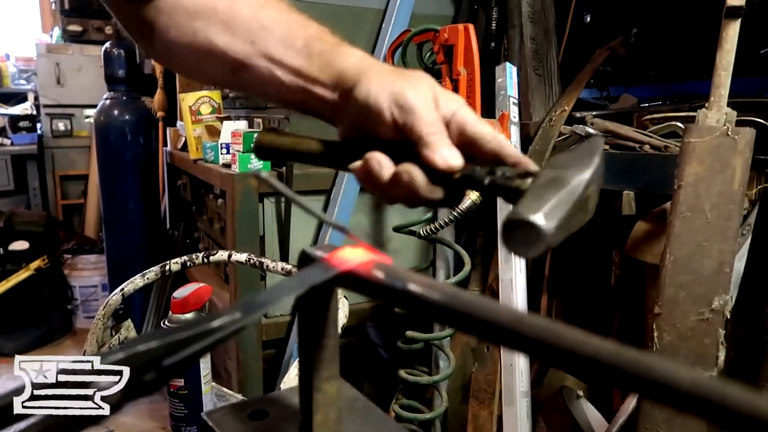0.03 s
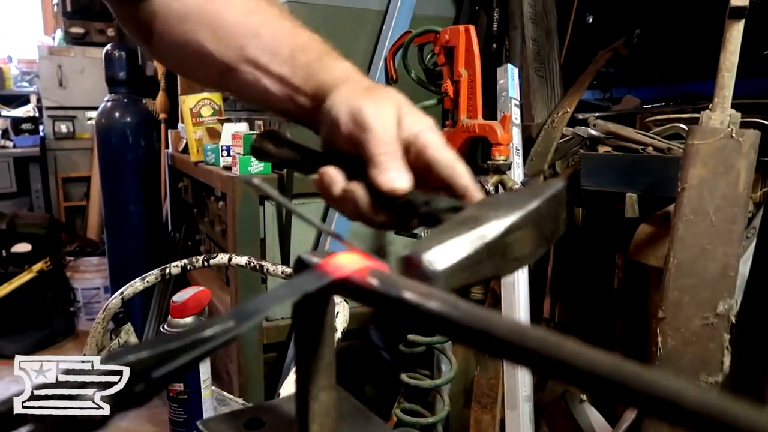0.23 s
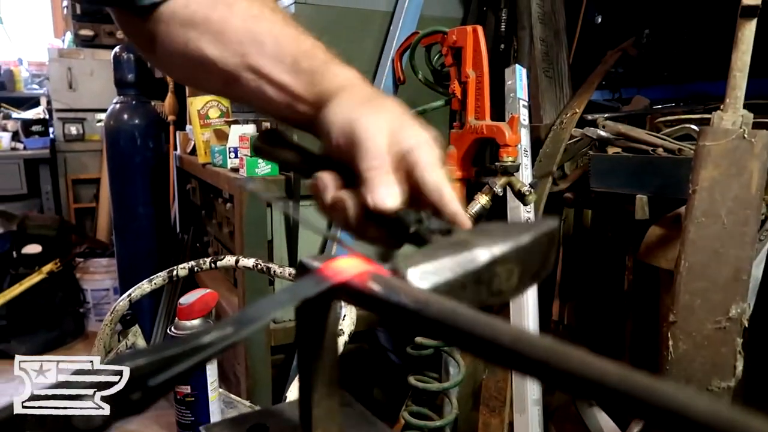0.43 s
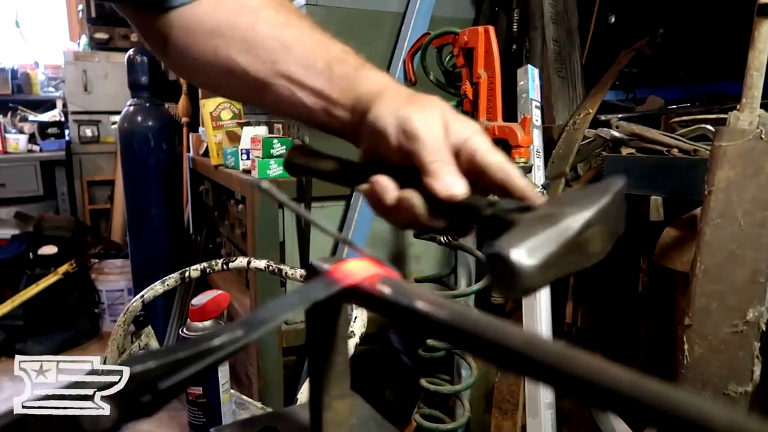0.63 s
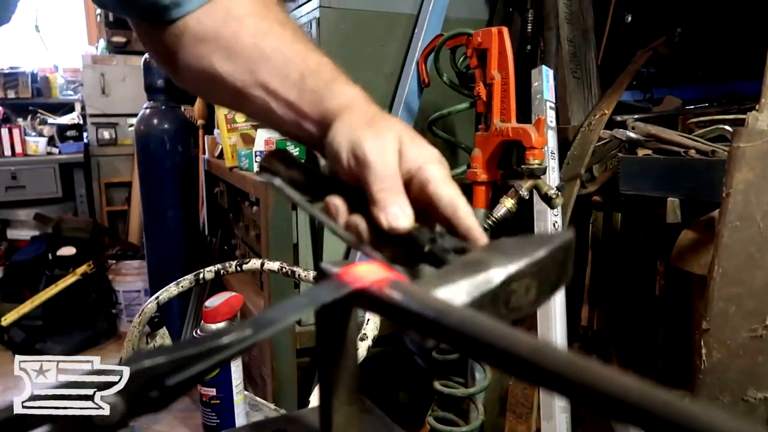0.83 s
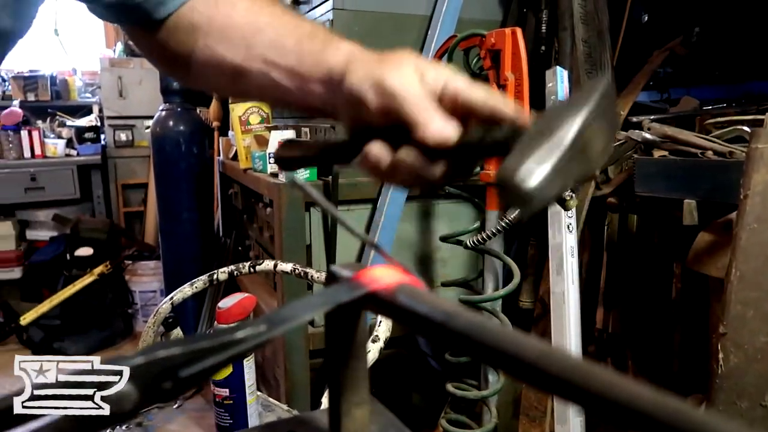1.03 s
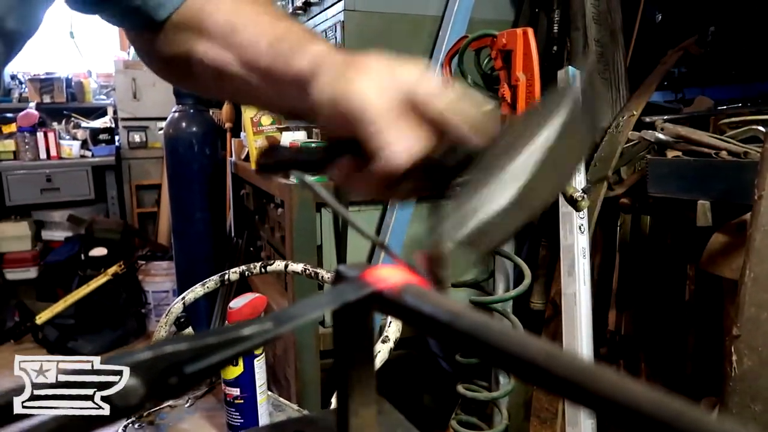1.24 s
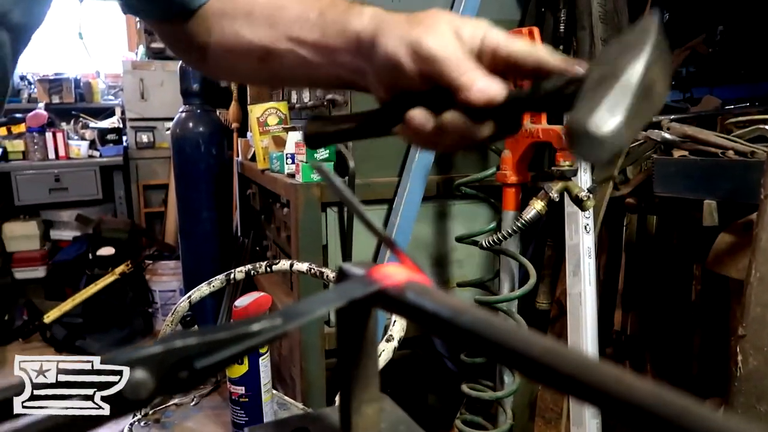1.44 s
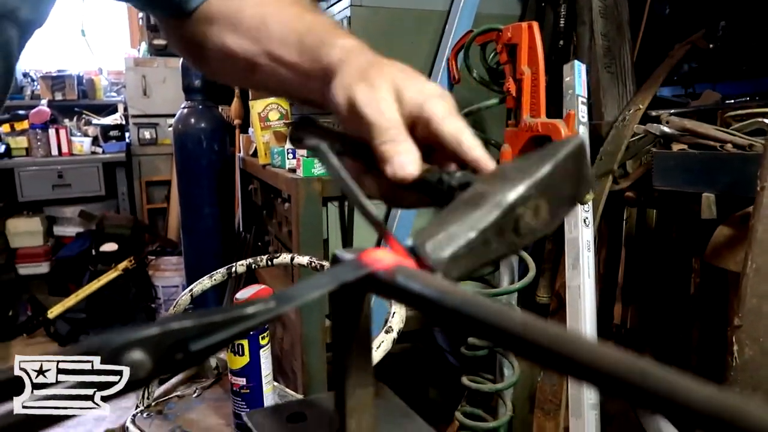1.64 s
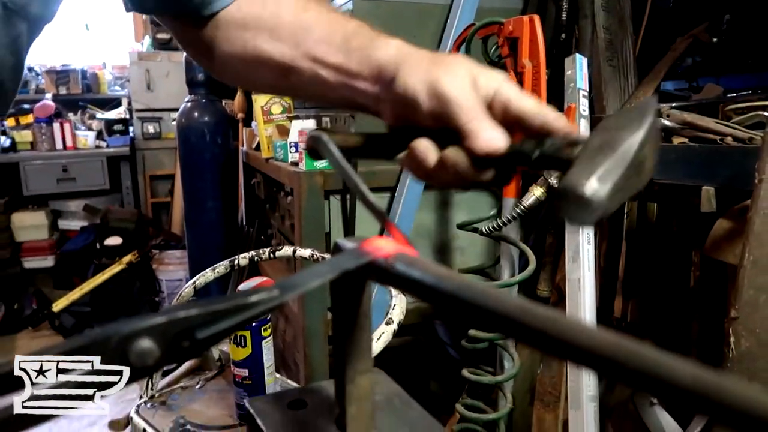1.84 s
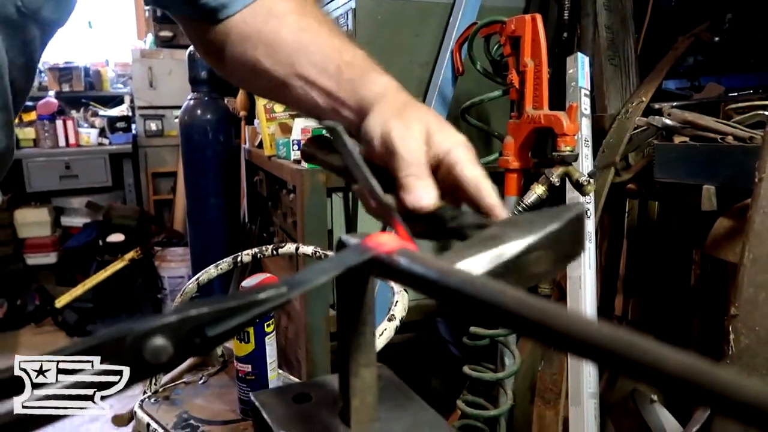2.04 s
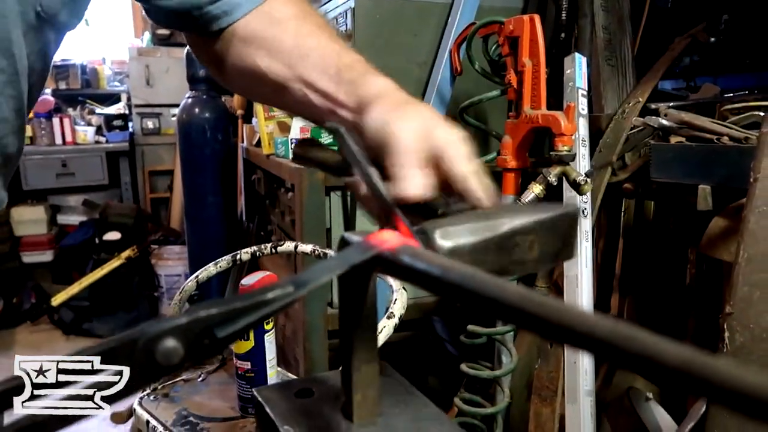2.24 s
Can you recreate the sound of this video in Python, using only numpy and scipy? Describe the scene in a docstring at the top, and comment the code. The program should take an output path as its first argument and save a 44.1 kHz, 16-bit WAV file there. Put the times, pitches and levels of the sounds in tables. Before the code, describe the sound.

Close stereo pickup of hammering on hot iron; hard cracking clanks with a dull low thud and quickly damped ring, three blows, a pause, three more, short room echo, very quiet background.

```python
"""A blow is already dying away; then more hammer blows fall on hot iron, about three a second, with one longer gap.
Each blow is a burst of noise (crack), a longer rattle (clatter) and damped sines: clank, iron bar, stand, anvil ring.
Soft low bumps and faint ticks fall in between, over workshop noise that sinks, then stays nearly steady.
Decaying noise makes the room's answer; a two-port microphone with a noise suppressor hears it all."""
import sys
import numpy as np
from scipy import signal
from scipy.fft import rfft, irfft, next_fast_len
from scipy.io import wavfile
from scipy.ndimage import uniform_filter1d

SR = 44100
rng = np.random.default_rng(int(sys.argv[2]) if len(sys.argv) > 2 else 0)


def unload_audio(sound):
    """Save the sound as a 16-bit wav file, at the path given as the first command line argument."""
    columns = np.transpose(np.atleast_2d(sound))
    # keep every value between -1 and 1, then stretch to whole-number steps
    steps = np.round(np.clip(columns, -1, 1) * 32767)
    wavfile.write(sys.argv[1], SR, steps.astype(np.int16))


def amplitude_ratio(level_db):
    """Convert a level in decibels to the matching linear amplitude (field) ratio."""
    exponent = np.asarray(level_db, float) / 20
    return 10 ** exponent


N = 101429  # length in samples
PAD = SR // 4  # samples of room for the blow that starts early

# when each blow lands: start_s (below 0 = before the sound begins)
BLOW_STARTS = [-.1, .2217, .5552, .8838, 1.3669, 1.6963, 2.0207]
# each blow's relative levels and brightness: crack_db, crack_bright_db_per_octave,
# clank_bright_db_per_octave, clank_db, ring_db, bar_db, thud_db, room_db
BLOW_LEVELS = [(-13, 0, 0, -18, -48, -21.5, -25.5, 5), (-5.5, -4, -5, -6, -25, -19.5, -25.5, 0),
               (-14.5, -3.5, 0, -11, -32.5, -25.5, -29.5, 2.5), (-12, -7, 1, -12, -43.5, -26, -30, 3),
               (-11.5, 3.5, 2, -18.5, -47.5, -16, -25, 1), (-9.5, 0.5, -1, -8, -34, -16, -29, -1.5),
               (-12.5, -1.5, -7.5, -17.5, -35.5, -24.5, -32, 4)]
# how well each blow's contact point wakes the hammer head's high chimes: level_db
UPPER_CHIME_LEVELS = [-0.5, 0, 1, 4, -8, -11.5, -14]
UPPER_CHIME_FROM_HZ = 3000

# colour of the crack: pitch_hz, level_db
CRACK_COLOUR = [(300, -42), (1000, -11.5), (3000, -2.5), (6000, -2.5), (9000, 2), (12000, -0.5),
                (15000, -3), (17000, -24)]
CRACK_T60_S = 0.016  # t60 = time to fall by 60 dB

# dense clatter of bar, tongs and vice: pitch_hz, level_db
CLATTER_COLOUR = [(150, -33.5), (300, -9), (500, -2.5), (900, -0.5), (1300, -11), (2500, -11.5),
                  (5000, -16.5), (10000, -25)]
CLATTER_OVER_BAR_DB, CLATTER_T60_S = 7, 0.13

# heavily damped tones of hammer head and hot iron: pitch_hz, level_db
CLANK_MODES = [(1190, -8.5), (1590, -7.5), (1810, 3.5), (1880, -1), (2350, -4.5), (2800, -4.5), (3110, 3.5),
               (3510, -3.5), (4200, -14), (4860, -14.5), (5600, -8), (6900, -31.5), (8700, -20)]
CLANK_T60_S, CLANK_RISE_S, CLANK_SCATTER_DB = 0.024, 0.0008, 1
CLANK_DETUNE = 0.01  # typical pitch change from blow to blow, as a fraction

# tones of the long iron bar: pitch_hz, level_db, t60_s
BAR_MODES = [(345, -15.5, .07), (412, -10.5, .08), (500.7, -5, 0.076), (619.5, -8.5, .08),
             (675, -3.5, 0.071), (810, -5, 0.091), (816, 1, 0.065), (1005, -15, 0.09)]
# tones of the stand: pitch_hz, level_db, t60_s
STAND_MODES = [(50.7, -8.5, 0.42), (116, -9.5, 0.049), (160, -1, 0.089), (198, 0.5, 0.14),
               (238.5, -1, 0.16), (330, -12.5, 0.23)]
LOW_RISE_S, LOW_SCATTER_DB = 0.0022, 2.5  # bar and stand
# the stand's shove, its pitch sagging
SWAY_FROM_HZ, SWAY_TO_HZ, SWAY_GLIDE_S = 170, 43.5, 0.015
SWAY_T60_S, SWAY_DB = 0.14, 2.5

# the anvil's tones: pitch_hz
ANVIL_PITCHES = [2669, 4461, 7838]
# strength and decay of those tones: level_db, t60_s
ANVIL_DECAYS = [(2, 0.4), (-29.5, .6), (-19.5, 0.3)]
# the hammer head's longer tones: pitch_hz
CHIME_PITCHES = [1832, 1956, 3456, 4113, 5582]
# their strength over the clank and their decay: level_db, t60_s
CHIME_DECAYS = [(-23.5, .26), (-24, 0.26), (-33.5, 0.27), (-27, 0.21), (-26.5, 0.17)]
RING_SWELL_S, RING_SCATTER_DB = 0.016, 1  # anvil and chimes

# decay of the room's answer: pitch_hz, t60_s
ROOM_DECAY = [(60, 0.69), (250, 0.26), (800, 0.19), (2000, 0.23), (5000, 0.19), (10000, 0.15),
              (15000, 0.057)]
# colour of the room's answer, beside the direct sound: pitch_hz, level_db
ROOM_COLOUR = [(60, -9.5), (300, -5), (1000, -3), (3000, -6), (6000, -4.5), (10000, -9.5), (15000, -8)]
# left-right likeness of the room's answer: pitch_hz, likeness (1 = the same)
ROOM_LIKENESS = [(150, .996), (350, .98), (800, .995), (2000, .85), (5000, .45), (10000, .6)]
FIRST_WALL_S, TONES_TO_ROOM_DB = 0.004, -4.5

# soft bumps as the work settles: start_s, level_db, pitch_hz
SOFT_BUMPS = [(0.132, -50, 160), (0.392, -65.5, 168), (0.701, -52, 164.6), (1.001, -65, 160),
              (1.07, -54.5, 185), (1.546, -53.5, 182), (1.608, -60.5, 183), (1.911, -48, 187),
              (2.129, -61, 186)]
BUMP_T60_S, BUMP_RISE_S = 0.24, 0.0029

# faint handling ticks: start_s, level_db
HANDLING_TICKS = [(1.56, -53.5), (1.582, -52), (1.96, -63)]
# colour of the ticks: pitch_hz, level_db
TICK_COLOUR = [(800, -26), (2000, -1), (4000, -3), (7000, -5), (10000, -25)]

# colour of the workshop background: pitch_hz, level_db
AIR_COLOUR = [(20, -2.5), (45, 0.5), (100, -10), (200, -9.5), (500, -19), (900, -19), (1500, -25.5),
              (3000, -27.5), (6000, -27.5), (10000, -37), (11000, -63.5)]
# its left-right likeness: pitch_hz, likeness (1 = the same)
AIR_LIKENESS = [(100, .999), (1000, .98), (4000, 1), (10000, 0.5)]
# its slow change in level: time_s, level_db
AIR_LEVELS = [(0, 3), (0.501, -2), (1.199, -4.5), (2.3, -4)]
AIR_DB = -60.5  # average level before the slow change

# phase lead of the first port over the second: pitch_hz, lead_rad
PORT_LEAD = [(300, -.08), (800, -.06), (1400, -.5), (3000, -.55), (4200, 0), (5000, 1.1), (8000, 1.6),
             (15000, 1.5)]
# level of the first port over the second: pitch_hz, level_db
PORT_TILT = [(700, 0), (1400, -1.7), (3000, -1.6), (5000, .4)]
LOW_CUT_HZ, TOP_HZ = 32, 15600

# the noise suppressor's threshold in each frequency bin: pitch_hz, level_db
GATE_THRESHOLD = [(50, -100), (300, -84), (1000, -91.5), (3000, -78.5), (8000, -89), (14000, -96.5)]
GATE_DEPTH_DB, GATE_RELEASE_S, GATE_STEEP = -9, 0.015, 1.5


def along(points, hz):
    """Reads a curve of (Hz, value) points, spaced by the logarithm of pitch."""
    f, v = np.transpose(points)
    return np.interp(np.log(hz + 1), np.log(f + 1), v)


def filtered(x, response):
    """Changes the strength and phase of each frequency by the given response."""
    n = x.shape[-1]
    m = next_fast_len(n + 8192)
    spectrum = rfft(x, m) * response(np.fft.rfftfreq(m, 1 / SR))
    return irfft(spectrum, m)[..., :n]


def pair(noise, alike, points):
    """Colours two noises and mixes them to a given left-right likeness."""
    def shares(hz):
        turn = np.arccos(np.clip(along(alike, hz), -1, 1)) / 2
        return amplitude_ratio(along(points, hz)) * [np.cos(turn), np.sin(turn)]

    mid, side = filtered(noise, shares)
    return np.array([mid + side, mid - side])


def modes(rows, t, rise_s, scatter_db):
    """Adds up dying sines, with small random changes of strength and starting phase."""
    hz, db, t60 = np.transpose(rows)[:, :, None]
    chance = rng.standard_normal((2, len(rows), 1))
    level = amplitude_ratio(db + scatter_db * chance[0] - 60 * t / t60)
    ring = level * np.sin(2 * np.pi * hz * t + 0.3 * chance[1])
    return ring.sum(0) * (1 - np.exp(-t / rise_s))


def hammer():
    """Adds every blow: its direct sounds and the room's answer to the shorter ones."""
    out = np.zeros((2, N + PAD + SR))
    t = np.arange(SR * 3 // 4) / SR
    for start_s, upper_db, levels in zip(BLOW_STARTS, UPPER_CHIME_LEVELS, BLOW_LEVELS):
        crack_db, edge_db, bright_db, clank_db, ring_db, bar_db, thud_db, room_db = levels
        noise = crack(t, crack_db, edge_db) + clatter(t, bar_db)
        tones = clank(t, clank_db, bright_db) + bar(t, bar_db) + thud(t, thud_db)
        ringing = anvil(t, ring_db) + chime(t, clank_db, upper_db)
        answer = amplitude_ratio(room_db) * room(noise + amplitude_ratio(TONES_TO_ROOM_DB) * tones)
        first = PAD + round(start_s * SR)
        out[:, first:first + len(t)] += noise + tones + ringing + answer
    return out[:, PAD:PAD + N]


def crack(t, level_db, edge_db):
    """The first hard contact: a very short burst of coloured noise."""
    burst = rng.standard_normal(len(t)) * amplitude_ratio(-60 * t / CRACK_T60_S)

    def colour(hz):
        tilt_db = edge_db * np.log2((hz + 1000) / 6000)  # no change at 5000 Hz
        return amplitude_ratio(along(CRACK_COLOUR, hz) + tilt_db)

    return amplitude_ratio(level_db) * filtered(burst, colour)


def clatter(t, bar_db):
    """Dense clatter of bar, tongs and vice: noise that rises fast and dies more slowly."""
    rattle = rng.standard_normal(len(t)) * amplitude_ratio(-60 * t / CLATTER_T60_S)
    rattle = rattle * (1 - np.exp(-t / LOW_RISE_S))
    coloured = filtered(rattle, lambda hz: amplitude_ratio(along(CLATTER_COLOUR, hz)))
    return amplitude_ratio(bar_db + CLATTER_OVER_BAR_DB) * coloured


def clank(t, level_db, bright_db):
    """Hammer head and hot iron: heavily damped tones, slightly detuned at each blow."""
    rows = []
    for hz, db in CLANK_MODES:
        detuned_hz = hz * (1 + CLANK_DETUNE * rng.standard_normal())
        rows.append((detuned_hz, db + bright_db * np.log2(hz / 2000), CLANK_T60_S))
    return amplitude_ratio(level_db - 3) * modes(rows, t, CLANK_RISE_S, CLANK_SCATTER_DB)


def bar(t, level_db):
    """The long iron bar shakes in its own damped tones."""
    return amplitude_ratio(level_db - 1.5) * modes(BAR_MODES, t, LOW_RISE_S, LOW_SCATTER_DB)


def thud(t, level_db):
    """The stand thuds in damped low tones, with a shove whose pitch sags."""
    glide = SWAY_GLIDE_S * (1 - np.exp(-t / SWAY_GLIDE_S))
    turns = SWAY_TO_HZ * t + (SWAY_FROM_HZ - SWAY_TO_HZ) * glide  # cycles so far
    sway = amplitude_ratio(SWAY_DB - 60 * t / SWAY_T60_S) * np.sin(2 * np.pi * turns)
    sway = sway * (1 - np.exp(-t / LOW_RISE_S))
    return amplitude_ratio(level_db - 4) * (modes(STAND_MODES, t, LOW_RISE_S, LOW_SCATTER_DB) + sway)


def anvil(t, level_db):
    """The anvil rings in long tones that swell in just after the blow."""
    rows = np.column_stack([ANVIL_PITCHES, ANVIL_DECAYS])
    return amplitude_ratio(level_db) * modes(rows, t, RING_SWELL_S, RING_SCATTER_DB)


def chime(t, clank_db, upper_db):
    """The hammer head's longer tones; the contact point sets how strong the high ones are."""
    rows = []
    for hz, (db, t60) in zip(CHIME_PITCHES, CHIME_DECAYS):
        rows.append((hz, db + upper_db * (hz > UPPER_CHIME_FROM_HZ), t60))
    return amplitude_ratio(clank_db) * modes(rows, t, RING_SWELL_S, RING_SCATTER_DB)


def room(x):
    """The room's answer: fresh noise as an echo tail, each frequency dying at its own speed."""
    hz, t, z = signal.stft(rng.standard_normal((2, SR // 2)), SR, nperseg=256)
    t60 = along(ROOM_DECAY, hz)[:, None]
    fading = z * amplitude_ratio(-60 * t / t60)
    even = fading / np.sqrt(t60 * SR / np.log(1e6))  # long tails get no extra energy
    tail = signal.istft(even, SR, nperseg=256)[1]
    tail = pair(tail, ROOM_LIKENESS, ROOM_COLOUR)
    tail = np.pad(tail, ((0, 0), (round(FIRST_WALL_S * SR), 0)))
    return signal.fftconvolve(x[None], tail, axes=1)[:, :len(x)]


def bumps():
    """The work settles: soft low contacts, each one dying sine."""
    out = np.zeros(N + SR)
    t = np.arange(SR // 3) / SR
    for start_s, db, hz in SOFT_BUMPS:
        first = round(start_s * SR)
        out[first:first + len(t)] += modes([(hz, db, BUMP_T60_S)], t, BUMP_RISE_S, 0)
    return out[:N]


def ticks():
    """Tools in the hand: tiny dry clicks made of short coloured noise."""
    out = np.zeros(N)
    t = np.arange(SR // 50) / SR
    for start_s, db in HANDLING_TICKS:
        first = round(start_s * SR)
        out[first:first + len(t)] += amplitude_ratio(db - 60 * t / 0.025) * rng.standard_normal(len(t))
    return filtered(out, lambda hz: amplitude_ratio(along(TICK_COLOUR, hz)))


def air():
    """The workshop background: coloured stereo noise with a slowly changing level."""
    x = pair(rng.standard_normal((2, N)), AIR_LIKENESS, AIR_COLOUR)
    level_db = np.interp(np.arange(N) / SR, *np.transpose(AIR_LEVELS))
    return amplitude_ratio(AIR_DB + level_db) * x / np.sqrt(np.mean(x ** 2))


def scene():
    """All sources added together at the microphone."""
    return hammer() + bumps() + ticks() + air()


def ports(x):
    """Sound reaches the microphone's two ports with unlike phase and level."""
    sides = np.array([[1], [-1]])

    def response(hz):
        level = amplitude_ratio(sides * along(PORT_TILT, hz) / 2)
        return level * np.exp(0.5j * sides * along(PORT_LEAD, hz))

    return filtered(x, response)


def suppressor(heard):
    """Noise suppressor: softly turns down, in both ports alike, bins near or below a threshold."""
    hz, t, z = signal.stft(heard, SR, nperseg=512, noverlap=384)
    power = uniform_filter1d(np.mean(abs(z) ** 2, 0), size=3, axis=0)  # blurred over nearby bins
    keep = np.exp(-(t[1] - t[0]) / GATE_RELEASE_S)
    held = signal.lfilter([1 - keep], [1, -keep], power)
    strongest = np.maximum(abs(held), power)  # opens at once, closes slowly
    threshold = amplitude_ratio(2 * along(GATE_THRESHOLD, hz))[:, None]  # as power
    over = (strongest / threshold) ** GATE_STEEP
    floor = amplitude_ratio(GATE_DEPTH_DB)
    gain = floor + (1 - floor) * over / (1 + over)
    return signal.istft(z * gain, SR, nperseg=512, noverlap=384)[1][:, :N]


def roll_off(x):
    """The treble ends steeply here."""
    return signal.sosfilt(signal.butter(12, 16970, fs=SR, output="sos"), x)


def record(dry):
    """The microphone: two ports, a steep low cut, the noise suppressor and a steep top cut."""
    low_cut = signal.butter(6, LOW_CUT_HZ, "high", fs=SR, output="sos")
    heard = signal.sosfilt(low_cut, ports(dry))
    quieted = suppressor(heard)
    mix = filtered(quieted, lambda hz: 1 / (1 + (hz / TOP_HZ) ** 60))
    return roll_off(mix)


dry = scene()
out = record(dry)
unload_audio(out)
```